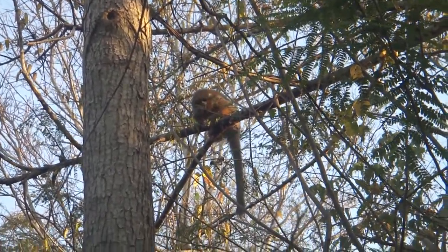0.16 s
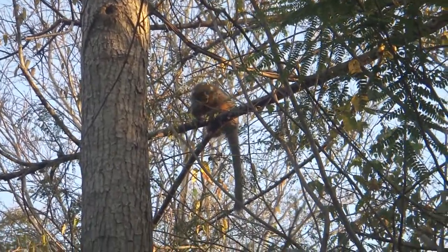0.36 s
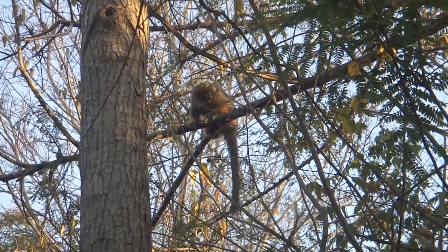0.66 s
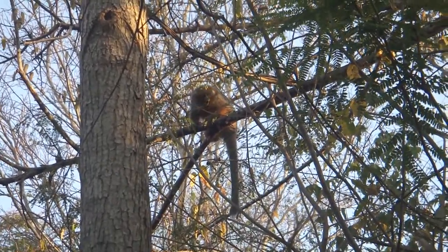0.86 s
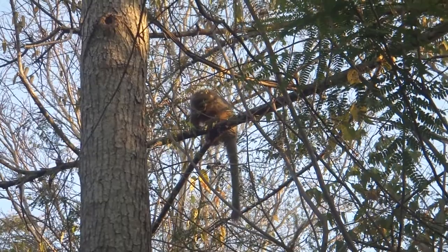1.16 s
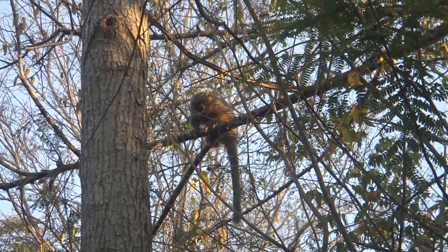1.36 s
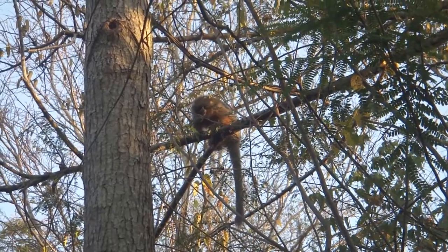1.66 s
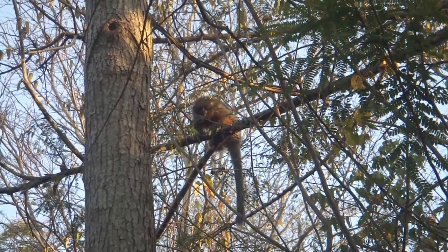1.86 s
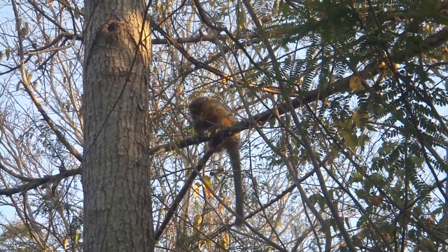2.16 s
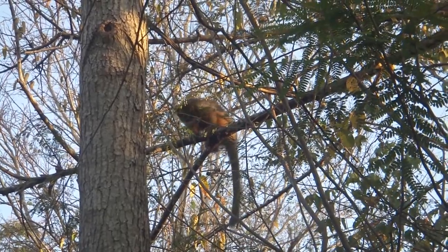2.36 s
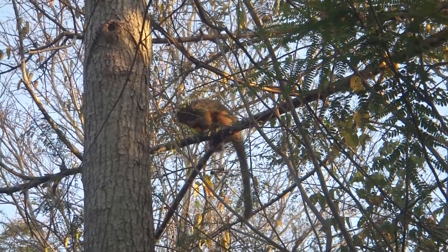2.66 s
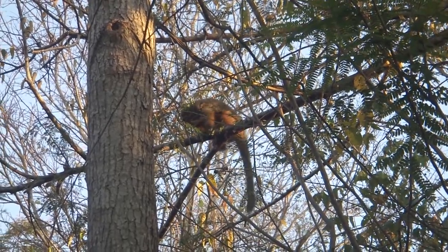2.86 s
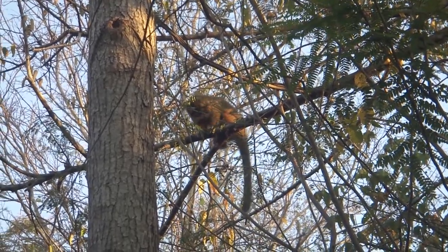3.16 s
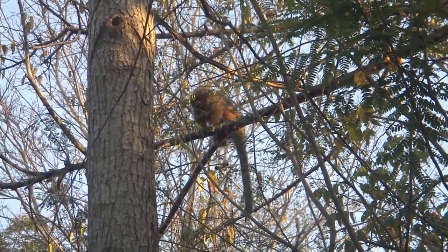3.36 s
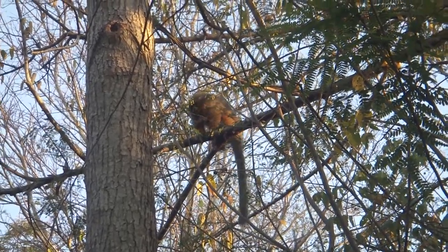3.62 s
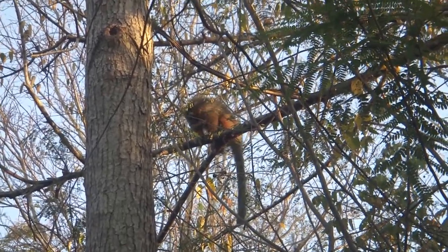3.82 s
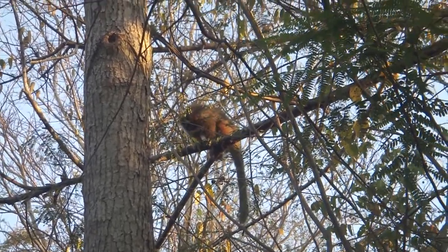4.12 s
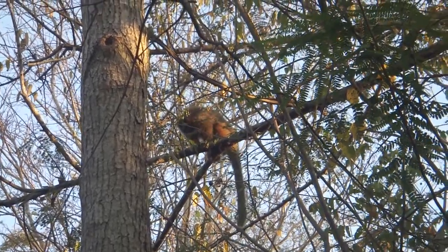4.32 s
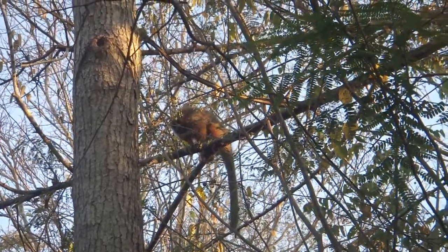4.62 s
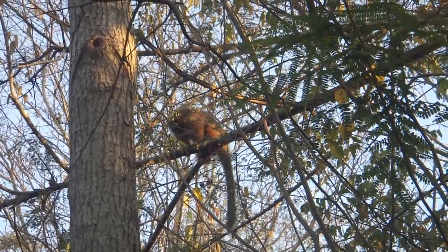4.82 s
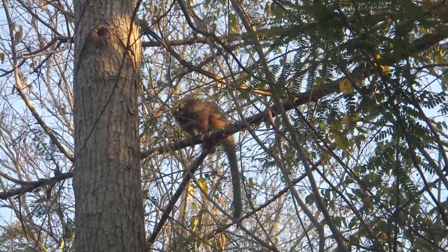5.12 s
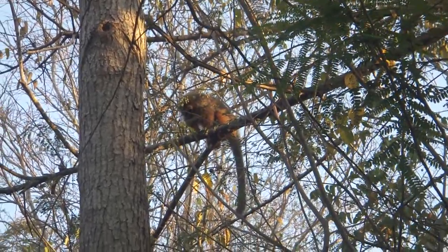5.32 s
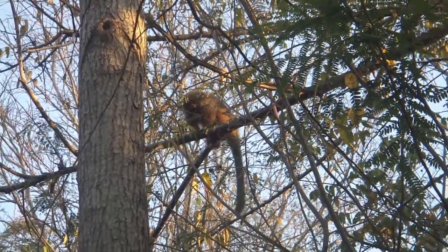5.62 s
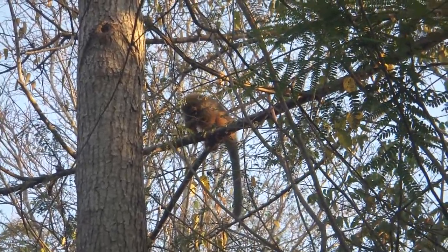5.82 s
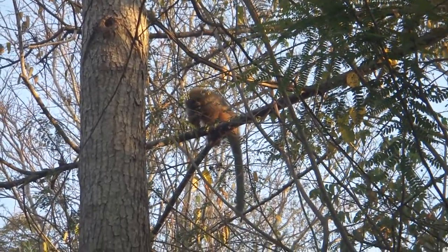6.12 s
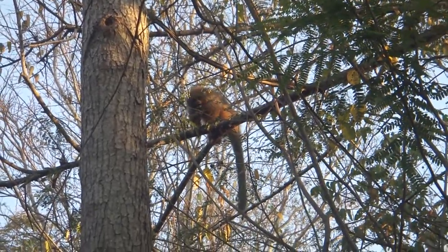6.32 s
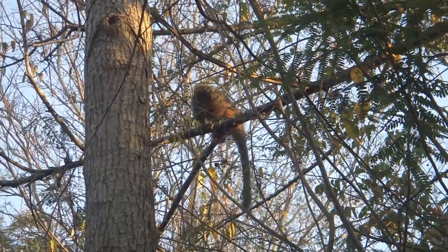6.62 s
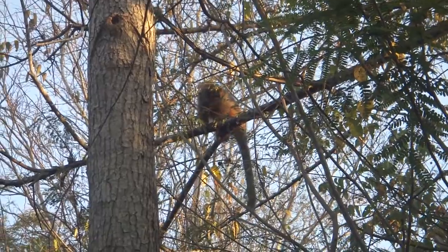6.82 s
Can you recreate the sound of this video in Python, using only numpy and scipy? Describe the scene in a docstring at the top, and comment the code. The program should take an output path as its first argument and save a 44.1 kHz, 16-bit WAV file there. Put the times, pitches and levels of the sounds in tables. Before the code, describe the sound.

A small monkey calls loudly and close from the very first instant. Each call is a very short, shrill whistle sweeping up from about 3.5 to 5 kHz, cracking at the crest with a trace of hoot, then dropping into a brief rough grunt. Six come between 0 and 1.5 s, two around 2.2 to 2.5 s, four from 3.1 to 3.9 s, five from 4.8 to 5.8 s, and two more at 6.5 and 6.75 s. Twigs tick lightly before 0.2 s. Distant squeals rise at 0.4 s and most clearly again at 4.1 s. A neighbour's thin, quavering peeps, mostly drooping, run from 0.9 to 3 s; another's fill 4.8 s to the end. Faint yelps begin near 1.8 s, soft dull thuds are scattered from 0.7 s, and leaves brush faintly around 6.1 to 6.4 s. Quiet outdoor air and diffuse tree echoes lie underneath in stereo.

```python
"""A small monkey whistles upward at once and in quick series: each sweep breaks into a hoot, then a grunt.
Twigs tick at the start, far squeals join at 0.4 s and thuds at 0.7 s; one neighbour peeps from 0.9 to 3 s.
Low yelps join from 1.8 s, a second neighbour peeps from 4.8 s to the end, and leaves brush near 6.2 s.
Calls are swept sines and harmonics in fixed resonances; twigs, leaves, thuds and air are shaped noise.
Trunk echoes and a diffuse tail scatter calls and foliage over a quiet outdoor rush."""
import sys
import numpy as np
from scipy import signal
from scipy.fft import rfft, irfft, next_fast_len
from scipy.io import wavfile
from scipy.ndimage import uniform_filter1d, minimum_filter1d, map_coordinates

SR = 44100
rng = np.random.default_rng(int(sys.argv[2]) if len(sys.argv) > 2 else 0)


def int16_out(signal):
    """Quantize to a 16-bit WAV file."""
    q = np.round(np.clip(np.atleast_2d(signal).T, -1, 1) * 32767)
    wavfile.write(sys.argv[1], SR, q.astype(np.int16))


N = 307818

# Event levels are relative, before the layer gains.
# near whistles, hoot at the crest: (crest time [s], rise [s], start [Hz], crest [Hz],
# sweep bow [+ arches, - sags], level [dB], hoot pitch [Hz], hoot level [dB])
SQUEAKS = [ (.002, 0.055, 3680, 4510, -0.11, -11, 813, -26.5),
           (0.304, 0.15, 3455, 5050, 1.12, -12, 822, -32.5),
           (.565, 0.097, 3334, 5045, -0.13, -10, 854, -25.5),
           (0.866, 0.15, 3310, 5047, 0.6, -13, 835, -30.5),
           (1.156, 0.13, 3240, 5090, 0.75, -15, 832, -33.5), (1.421, 0.1, 3280, 4900, 0.12, -12, 837, -30),
           (2.229, 0.047, 3730, 4570, -0.83, -11.5, 827, -23.5),
           (2.496, .066, 3440, 4745, 0.0015, -9.5, 838, -26.5),
           (3.118, 0.058, 3806, 4660, -0.084, -13.5, 818, -27.5),
           (3.354, 0.084, 3350, 4743, .05, -12, 841, -26), (3.632, 0.1, 3390, 4826, -0.11, -13.5, 866, -25),
           (3.916, .1, 3350, 4825, 0.052, -13, 848, -25.5),
           (4.779, 0.059, 3870, 4670, -0.065, -11, 830, -27),
           (4.998, 0.065, 3560, 5010, 0.028, -10, 887, -24),
           (5.279, 0.099, 3490, 5155, 0.74, -16.5, 900, -28),
           (5.566, 0.13, 3460, 5160, 1.17, -14.5, 870, -30.5),
           (5.828, 0.069, 3555, 4883, -0.16, -9.5, 882, -21),
           (6.495, 0.072, 3990, 4880, -0.51, -12, 810, -28),
           (6.755, .078, 3330, 5040, 0.31, -11.5, 856, -22.5)]
# near whistle resonances, shared by fundamental and octave: (frequency [Hz], gain [dB])
WHISTLE_THROAT = [(3300, -13.5), (3750, -15), (4200, -4.5), (4550, -5.5), (4950, 2.5), (5300, 4.5),
                  (6800, -18), (7500, -12), (8300, -4), (8900, -0.5), (9800, -4.5), (10400, 0.5)]
# hoot resonances: (frequency [Hz], gain [dB])
HOOT_THROAT = [(600, 4.5), (850, -8), (1700, -6), (2500, -20), (3400, -24), (5000, -2), (6000, -11),
               (6800, -47)]
ONSET_S, ONSET_DB = 0.036, -13.5  # soft whistle start
BREAK_S, BREAK_HZ, BREAK_DB = 0.041, 4063, -28  # after the crest: duration, final pitch, fade

# grunt after each whistle: (time [s], starting pitch [Hz], mouth level [dB], rasp level [dB])
GRUNTS = [(0.057, 577, -23.5, -31.5), (.357, 609, -21, -24.5), (.63, 614, -21, -26.5),
          (0.926, 613, -25, -29.5), (1.216, 597, -27, -31.5), (1.486, 529, -30.5, -39),
          (2.288, 548, -21, -31.5), (2.556, 590, -16, -30), (3.174, 551, -25.5, -38),
          (3.419, 523, -26, -39), (3.699, 557, -23, -31.5), (3.978, 547.6, -26.5, -38),
          (4.833, 604, -21.5, -31), (5.06, 616, -23.5, -32), (5.34, 627, -25.5, -34),
          (5.631, 570, -28, -33), (5.896, 578, -23.5, -30), (6.552, 544, -34, -46),
          (6.816, 573, -20.5, -28)]
# grunt pitch contour: (time from start [s], share of starting pitch [1])
GRUNT_FALL = [(0, 1.01), (.016, .985), (.032, .885), (.048, .745), (.068, .6), (.1, .48)]
# grunt resonance regions, low to high: (frequency [Hz], gain [dB])
CHEST_THROAT = [(150, -9.5), (330, -6), (520, 0.5), (680, -9.5), (900, -35.5), (1500, -86)]
MOUTH_THROAT = [(500, -50), (800, -12.5), (1150, -11), (1400, -8), (1620, -1.5), (1800, 1), (2050, -14),
                (2400, -17), (3000, -26), (4500, -72.5)]
RASP_THROAT = [(1500, -61), (2800, -15.5), (3700, -5), (4500, 3.5), (5200, -3), (5900, -1), (6500, -11.5),
               (7200, -23), (10000, -33)]
CHEST_DB, CHEST_DB_PER_MOUTH_DB = -25.7, 0.47  # chest gains less from effort than mouth
MOUTH_SCATTER = 0.014  # standard deviation of resonance shift, share of frequency

# neighbours' peeps: (time [s], length [s], time to turning pitch [s], start [Hz], turning pitch [Hz],
# end [Hz], level [dB], attack [s], caller [0 or 1])
PEEPS = [ (0.853, 0.28, .32, 3230, 4350, 4330, -14, 0.037, 0),
         (1.407, .17, 0.034, 4070, 3947, 3623, -19.5, 0.025, 0),
         (1.607, 0.14, 0.041, 3605, 3902, 3464, -13.5, 0.055, 0),
         (1.829, 0.14, 0.013, 3890, 4240, 3026, -17, 0.073, 0),
         (2.06, 0.13, 0.044, 3750, 4120, 3116, -18, 0.081, 0),
         (2.278, .18, 0.085, 3990, 3760, 2720, -21.5, 0.044, 0),
         (2.547, 0.15, .046, 3800, 3763, 2795, -26, 0.054, 0),
         (2.794, 0.16, 0.039, 3030, 3784, 2280, -27, .04, 0),
         (4.836, 0.36, 0.32, 3095, 4384, 4370, -13, 0.092, 1),
         (5.282, 0.13, 0.08, 3600, 4264, 3750, -19.5, 0.016, 1),
         (5.45, .16, 0.068, 4050, 4200, 3250, -23.5, .02, 1),
         (5.68, 0.14, 0.012, 4090, 4000, 3100, -22.5, 0.15, 1),
         (5.903, .12, .025, 3770, 3780, 2800, -20.5, 0.022, 1),
         (6.088, 0.14, .048, 3170, 3570, 2864, -14.5, .024, 1),
         (6.302, 0.14, 0.026, 3420, 4013, 2764, -17, 0.077, 1),
         (6.52, 0.14, 0.026, 3452, 3707, 2790, -17, 0.087, 1),
         (6.756, 0.093, 0.014, 3560, 3440, 2896, -16, 0.036, 1),
         (6.912, 0.13, 0.02, 2992, 3154, 3020, -18, 0.0081, 1)]
PEEP_RISE_POWER, PEEP_FALL_POWER = 1.7, 1.6  # round the contour on either side of the turn
PEEP_ONSET_DB, PEEP_RELEASE_S, PEEP_RELEASE_DB = -12.5, 0.041, -11.5
QUAVER, QUAVER_KNOTS_PER_S = 0.00613, 49  # pitch unsteadiness: share of pitch, rate

# far squeals: (time [s], length [s], start [Hz], top [Hz], level [dB], octave level [dB])
FAR_SQUEALS = [(0.401, 0.27, 4976, 5567, -21, -28.5), (1.583, .27, 4520, 5260, -29.5, -34.5),
               (2.014, 0.47, 4470, 5130, -39.5, -45.5), (2.781, 0.1, 4090, 4600, -38.5, -41),
               (3.514, .13, 4200, 4530, -33, -38), (4.026, .12, 4150, 4710, -35.5, -38.5),
               (4.112, .18, 4858, 5565, -23, -28.5), (4.506, 0.131, 4330, 4680, -31.5, -48.5),
               (5.651, 0.1, 4530, 4900, -54, -36.5), (6.544, 0.16, 4790, 4930, -35.5, -35.5)]
FAR_RISE, FAR_FALL = 0.39, 0.17  # shares of length spent swelling and fading

# neighbours' yelps: (time [s], pitch [Hz], level [dB])
YELPS = [(1.773, 1518, -47), (2.078, 1448, -44), (2.838, 1378, -44), (4.252, 1540, -39), (4.595, 1437, -52),
         (5.725, 1436, -42.5), (6.409, 1417, -43.5), (6.63, 1530, -42)]
# yelp resonances: (frequency [Hz], gain [dB])
YELP_THROAT = [(1400, 2.0), (2800, -5), (5500, -3.5), (7500, -12)]
YELP_S = 0.066

# twig ticks: (time [s], level [dB])
TWIGS = [(0.046, -14.5), (0.193, -23.5)]
# twig colour: (frequency [Hz], gain [dB])
WOOD = [(50, -51), (200, -16), (400, 15), (2500, 8.5), (5000, -34), (11000, -31)]
# leaf brushes: (time [s], length [s], level [dB])
RUSTLES = [(6.074, 0.15, -41), (6.3, 0.13, -38)]
# leaf noise spectrum: (frequency [Hz], relative density [dB per Hz])
LEAVES = [(60, -58), (300, -12), (1500, -3.5), (4500, -2), (6500, -3.5), (8000, -14.5), (11000, -19.5)]

# soft low thuds: (time [s], level [dB])
BUMPS = [(0.709, -45), (1.24, -48), (1.58, -42.5), (1.78, -52), (4.27, -50), (5.649, -55.5), (6.2, -68)]
# thud noise spectrum: (frequency [Hz], relative density [dB per Hz])
THUD = [(30, -47), (90, -17), (160, -5.0), (260, 0.5), (500, -14), (2000, -75)]

# outdoor rush spectrum: (frequency [Hz], relative density [dB per Hz])
AIR = [(25, -55), (70, -29), (160, -7), (300, -3), (600, 0), (1400, 3.5), (2500, -5), (5000, -10),
       (7000, -11), (11000, -28)]
# rush level contour: (time [s], level [dB])
AIR_LEVEL = [(0, -45), (1, -44.5), (2.6, -42.5), (4.4, -47), (5.7, -44), (6.98, -40.5)]
# side part of the rush: (frequency [Hz], gain [dB])
AIR_SIDE = [(130, -4), (300, 3), (1500, -8), (6000, 0.5)]
BASS_DB, BASS_SWING_DB = -2.5, 6  # rush bass: mean gain, random swing

# diffuse tail decay: (frequency [Hz], t60 [s])
GROVE = [(200, 0.4), (1500, 0.41), (4500, 0.55), (10000, 0.36)]
# strength of echoes and tail: (frequency [Hz], gain [dB])
SCATTER = [(1500, 2.5), (3500, -0.5), (5200, 3), (7600, -3), (9000, 3.5), (10500, 2)]

# treble lead of the left port: (frequency [Hz], phase [rad])
PORT_PHASE = [(5500, 0), (8500, 0.89), (11000, 0.75)]
# microphone bass response: (frequency [Hz], gain [dB])
LOW_CUT = [(20, -6), (60, 1), (130, 0)]
# response at the band edge: (frequency [Hz], gain [dB])
BAND_EDGE = [(10000, 0), (10600, 6.5), (11300, -9)]
TOP_HZ = 11450  # band limit
CEILING_DB, HOLD_S = -9.5, 0.015  # limiter: rms threshold, gain window
LEFT_RIGHT = np.array([[1], [-1]])


def amp(db):
    """Decibels to gain."""
    return 10 ** (np.asarray(db) / 20)


def unit(x):
    """Scale to rms 1."""
    return x / np.sqrt(np.mean(x ** 2) + 1e-20)


def along(points, hz):
    """Read (Hz, value) points on a log frequency axis."""
    f, v = np.transpose(points)
    return np.interp(np.log(hz + 1), np.log(f + 1), v)


def clock(length_s):
    """Sample times of a short sound."""
    return np.arange(max(int(length_s * SR), 8)) / SR


def ramp(t, length):
    """0 to 1 in a given time."""
    return np.clip(t / length, 0, 1)


def wobble(t, knots_per_s):
    """Smooth random curve."""
    return map_coordinates(rng.standard_normal(1024), [t * knots_per_s], mode="wrap")


def swell(t, start, rise, end, fall):
    """Gate with rounded edges."""
    return np.sin(np.pi / 2 * ramp(t - start, rise) * ramp(end - t, fall)) ** 2


def cycles(hz):
    """Running phase [rad] of a moving pitch."""
    return 2 * np.pi * np.cumsum(hz) / SR


def add(track, time_s, sound):
    """Mix a sound into a track."""
    i = round(time_s * SR) + np.arange(len(sound))
    inside = (i >= 0) & (i < N)
    track[i[inside]] += sound[inside]


def filtered(x, response):
    """Apply a complex frequency response."""
    m = next_fast_len(N + SR // 2)
    return irfft(rfft(x, m) * response(np.fft.rfftfreq(m, 1 / SR)), m)[..., :N]


def noise(spectrum):
    """Coloured noise of rms 1."""
    return unit(filtered(rng.standard_normal(N), lambda hz: amp(along(spectrum, hz))))


def voiced(pitch, throat, count=26):
    """Vocal-fold harmonics slide through fixed resonances; random phases spread each pulse in time."""
    k = np.arange(1, count + 1)[:, None]
    lag = rng.uniform(0, 2 * np.pi, (count, 1)) * np.minimum(k / 12, 0.75)
    gain = amp(along(throat, k * pitch)) * (k * pitch < TOP_HZ)
    return np.sqrt(2) * np.sum(gain * np.cos(k * cycles(pitch) + lag), axis=0)


def whistle(t, pitch, jitter, flutter_db):
    """Phase and fluttering envelope of one jittered whistle."""
    phase = cycles(pitch * (1 + jitter * (wobble(t, 89.7) + 1.15 * wobble(t, 445.3))))
    gate = swell(t, 0, 0.008, t[-1], 0.008)
    return phase, np.sqrt(2) * gate * amp(flutter_db * wobble(t, 133.1))


def hoot_arch(t, hoot_hz):
    """Hoot pitch arches to its top 21 ms after the whistle crest."""
    return hoot_hz * (1 - 0.12 * np.clip((t - 0.021) / 0.02355, -1.3, 1.6) ** 2)


def squeaks():
    """Rising whistles; at the crest the vocal folds start, hoot and put sidebands on the whistle."""
    out = np.zeros(N)
    for crest_s, rise_s, start_hz, crest_hz, bow, db, hoot_hz, hoot_db in SQUEAKS:
        t = clock(rise_s + BREAK_S)
        u = t - rise_s
        up, down = ramp(t, rise_s), ramp(u, BREAK_S)
        pitch = start_hz + (crest_hz - start_hz) * (up + bow * up * (1 - up))
        pitch = pitch + (BREAK_HZ - crest_hz) * down ** 0.85
        phase, envelope = whistle(t, pitch, jitter=0.0047, flutter_db=2.13)
        effort = amp(db + ONSET_DB * (1 - ramp(t, ONSET_S)) + BREAK_DB * down ** 2)
        fold_hz = hoot_arch(u, hoot_hz) * (1 + 0.038 * wobble(t, 400))
        folds = swell(u, 0, 0.012, 0.072, 0.02) * np.exp(1j * cycles(fold_hz))
        # pitch and size swing a quarter cycle apart: sidebands lie mainly above the whistle
        phase = phase + 0.23 * folds.imag
        first = amp(along(WHISTLE_THROAT, pitch))
        octave = amp(along(WHISTLE_THROAT, 2 * pitch))
        # third partial only while it fits below the band limit
        third = octave * amp(-8) * np.clip((TOP_HZ - 3 * pitch) / 600, 0, 1)
        tone = first * np.sin(phase) + octave * np.sin(2 * phase) + third * np.sin(3 * phase)
        add(out, crest_s - rise_s, envelope * effort * tone * (1 + 0.3 * folds.real))

        v = clock(0.058)
        hoot_pitch = hoot_arch(v, hoot_hz) * (1 + 0.029 * wobble(v, 500))
        hoot_gate = swell(v, 0, 0.022, v[-1], 0.034)
        add(out, crest_s, amp(hoot_db - 2.5) * hoot_gate * voiced(hoot_pitch, HOOT_THROAT, count=8))
    return out


def grunts():
    """Fast-falling voice: chest first, then open mouth, then a rasping top."""
    out, t = np.zeros(N), clock(0.11)
    for time_s, start_hz, mouth_db, rasp_db in GRUNTS:
        pace = 1 + 0.04 * rng.standard_normal()
        fall = np.interp(t * pace, *np.transpose(GRUNT_FALL))
        pitch = start_hz * fall * (1 + 0.0093 * wobble(t, 276))
        chest_gate = swell(t, 0, 0.009, 0.088, 0.03)
        chest_gain = amp(CHEST_DB + CHEST_DB_PER_MOUTH_DB * mouth_db)
        chest = chest_gain * chest_gate * voiced(pitch, CHEST_THROAT, count=4)
        mouth_gate = swell(t, 0, 0.016, 0.074, 0.026)
        shape = np.array(MOUTH_THROAT) * [1 + MOUTH_SCATTER * rng.standard_normal(), 1]
        mouth = amp(mouth_db + 2 - 100 * t) * mouth_gate * voiced(pitch, shape, count=12)
        rasp_gate = swell(t, 0, 0.024, 0.07, 0.04)
        rasp = amp(rasp_db - 3.0) * rasp_gate * voiced(pitch, RASP_THROAT)
        rasp = rasp * (1 + 0.33 * wobble(t, 1379))
        add(out, time_s, (chest + mouth + rasp) * amp(1.98 * wobble(t, 260)))
    return out


def peeps(caller, octave_db, jitter, flutter_db):
    """One neighbour's nearly pure, quavering whistles bend through a rounded turning pitch."""
    out = np.zeros(N)
    for time_s, length_s, turn_s, start_hz, turn_hz, end_hz, db, attack_s, who in PEEPS:
        if round(who) != caller:
            continue
        t = clock(length_s)
        before = 1 - ramp(t, turn_s)
        after = ramp(t - turn_s, abs(length_s - turn_s) + 1 / SR)
        pitch = turn_hz + (start_hz - turn_hz) * before ** PEEP_RISE_POWER
        pitch = pitch + (end_hz - turn_hz) * after ** PEEP_FALL_POWER
        pitch = pitch * (1 + QUAVER * wobble(t, QUAVER_KNOTS_PER_S))
        phase, envelope = whistle(t, pitch, jitter, flutter_db)
        onset_db = PEEP_ONSET_DB * (1 - ramp(t, attack_s))
        release_db = PEEP_RELEASE_DB * (1 - ramp(length_s - t, PEEP_RELEASE_S))
        tone = np.sin(phase) + amp(octave_db) * np.sin(2 * phase)
        add(out, time_s, envelope * amp(db + onset_db + release_db) * tone)
    return out


def far_squeals():
    """High whistles from deeper in the trees rise and level off."""
    out = np.zeros(N)
    for time_s, length_s, start_hz, top_hz, db, octave_db in FAR_SQUEALS:
        t = clock(length_s)
        u = ramp(t, length_s)
        pitch = top_hz + (start_hz - top_hz) * (1 - u) ** 2.1
        phase, envelope = whistle(t, pitch, jitter=0.00643, flutter_db=3)
        effort = np.sqrt(swell(u, 0, FAR_RISE, 0.82, FAR_FALL))
        tone = amp(db) * np.sin(phase) + amp(octave_db + 1.5) * np.sin(2 * phase)
        add(out, time_s, envelope * effort * tone)
    return out


def yelps():
    """Short, sinking voiced notes with weak overtones."""
    out, t = np.zeros(N), clock(YELP_S)
    for time_s, hz, db in YELPS:
        pitch = hz * (1 - 2.4 * t + 0.028 * wobble(t, 300))
        gate = swell(t, 0, 0.011, YELP_S, 0.047)
        add(out, time_s, amp(db + 3.5) * gate * voiced(pitch, YELP_THROAT, count=5))
    return out


def foliage():
    """Twig ticks are fast-decaying noise; leaf brushes are gated noise."""
    ticks, brush = np.zeros(N), np.zeros(N)
    for time_s, db in TWIGS:
        add(ticks, time_s, amp(db - 60 * clock(0.03) / 0.0073))  # t60 7.3 ms
    for time_s, length_s, db in RUSTLES:
        add(brush, time_s, amp(db) * swell(clock(length_s), 0, 0.043, length_s, 0.044))
    twigs = filtered(ticks * rng.standard_normal(N), lambda hz: amp(along(WOOD, hz)))
    return twigs + brush * noise(LEAVES)


def bumps():
    """Faint, dull thuds close to the microphone: independent low noise at each port."""
    level = np.zeros(N)
    for time_s, db in BUMPS:
        add(level, time_s, amp(db) * swell(clock(0.1), 0, 0.016, 0.1, 0.1))
    return level * np.array([noise(THUD), noise(THUD)])


def air():
    """Soft outdoor rush: shared noise plus opposed side noise, with unsteady bass."""
    t = np.arange(N) / SR
    side = filtered(noise(AIR), lambda hz: amp(along(AIR_SIDE, hz)))
    rush = noise(AIR) + LEFT_RIGHT * side
    bass = filtered(rush, lambda hz: 1 / (1 + (hz / 260) ** 4))
    rush = rush - bass + bass * amp(BASS_DB + BASS_SWING_DB * wobble(t, 11))
    level_db = np.interp(t, *np.transpose(AIR_LEVEL)) - 2 + 1.3 * wobble(t, 9.8)
    return amp(level_db) * rush


def placed(x, lead_ms, left_db, trunks_db, grove_db, count=14):
    """Direct sound with port time and level differences, early trunk echoes and a diffuse grove tail."""
    gain = amp(LEFT_RIGHT * left_db / 2)
    direct = filtered(x, lambda hz: gain * np.exp(1j * np.pi * hz * LEFT_RIGHT * lead_ms / 1000))

    # each echo reaches the ports at slightly different times
    trunks = np.zeros((2, SR // 8))
    arrival_s, size = rng.uniform(0.003, 0.05, count), rng.standard_normal(count)
    for port in trunks:
        port_s = arrival_s + rng.uniform(0, 0.00005, count)
        port[(port_s * SR).astype(int)] = size / np.linalg.norm(size)
    early = signal.fftconvolve(direct, trunks, axes=1)[:, :N]

    mid, side = rng.standard_normal((2, SR))
    hz, t, z = signal.stft(mid + 0.72 * LEFT_RIGHT * side, SR, nperseg=256)
    decay = amp(-60 * t / along(GROVE, hz)[:, None]) * ramp(t, 0.0026)
    tail = signal.istft(z * decay, SR, nperseg=256)[1]
    late = signal.fftconvolve(x[None], tail / np.linalg.norm(tail[0]), axes=1)[:, :N]

    echoes = amp(trunks_db) * early + amp(grove_db) * late
    return direct + filtered(echoes, lambda hz: amp(along(SCATTER, hz)))


def limited(x):
    """Limiter: one gain for both ports falls around sound above the threshold."""
    power = uniform_filter1d(np.mean(x ** 2, axis=0), size=200)
    level = np.sqrt(np.abs(power))
    needed = amp(CEILING_DB) / np.maximum(level, amp(CEILING_DB))
    hold = int(HOLD_S * SR) + 1
    return x * uniform_filter1d(minimum_filter1d(needed, hold), hold)


def scene():
    """Near caller, neighbours, foliage, thuds and air."""
    near = placed(squeaks(), lead_ms=0.0028, left_db=-0.7, trunks_db=-17.5, grove_db=-15.0)
    low = placed(grunts(), lead_ms=0.003, left_db=-0.95, trunks_db=-12, grove_db=-17.0)
    first = peeps(0, octave_db=-49, jitter=0.0082, flutter_db=3.0)
    first = placed(first, lead_ms=-0.022, left_db=-3.0, trunks_db=-7, grove_db=-8.0)
    second = peeps(1, octave_db=-44, jitter=0.0054, flutter_db=3.0)
    # leads at the left port but is louder at the right
    second = placed(second, lead_ms=0.047, left_db=-3.5, trunks_db=-7, grove_db=-14.5)
    far = placed(far_squeals(), lead_ms=-0.0596, left_db=-1.0, trunks_db=-18.5, grove_db=-8.0)
    small = placed(yelps() + foliage(), lead_ms=0, left_db=1.0, trunks_db=-11.5, grove_db=-5.0)
    calls = amp(1.5) * near + amp(2.0) * low + amp(-2.0) * first + second + amp(2.5) * far
    return calls + small + bumps() + air()


def record(dry):
    """Two microphone ports differ in treble phase; response, limiter and band limit follow."""
    ports = filtered(dry, lambda hz: np.exp(0.5j * LEFT_RIGHT * along(PORT_PHASE, hz)))
    coloured = filtered(ports, lambda hz: amp(along(BAND_EDGE, hz) + along(LOW_CUT, hz)))
    return filtered(limited(coloured), lambda hz: hz < TOP_HZ)


dry = scene()
out = record(dry)
int16_out(out)
```